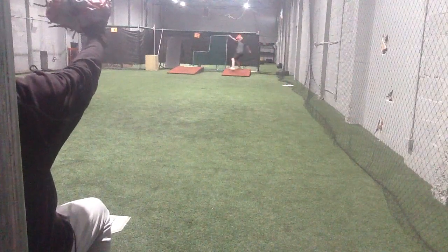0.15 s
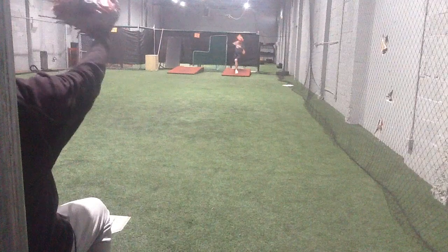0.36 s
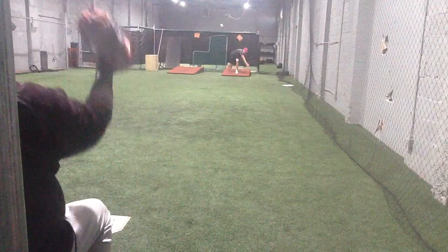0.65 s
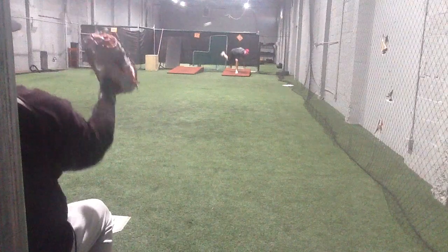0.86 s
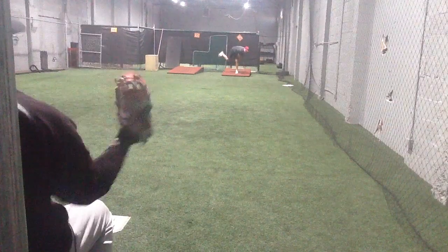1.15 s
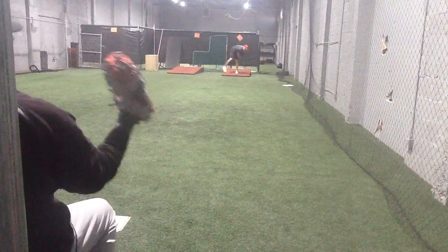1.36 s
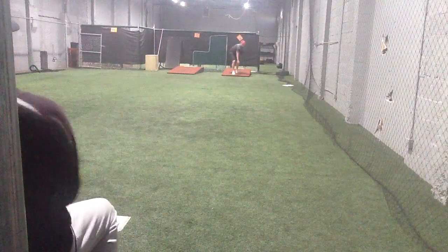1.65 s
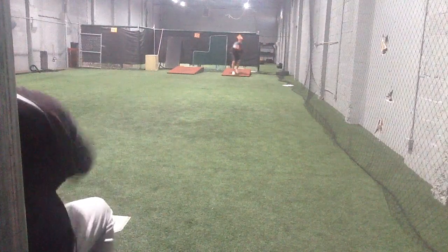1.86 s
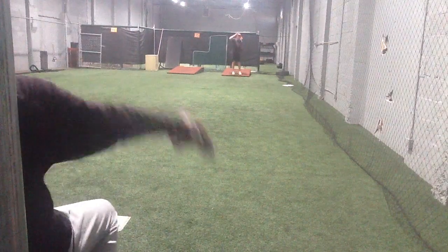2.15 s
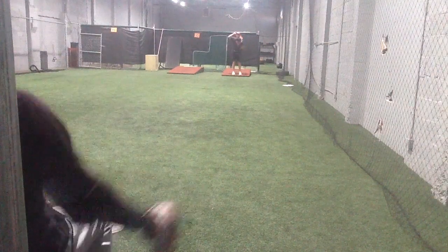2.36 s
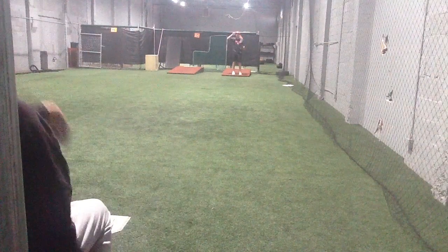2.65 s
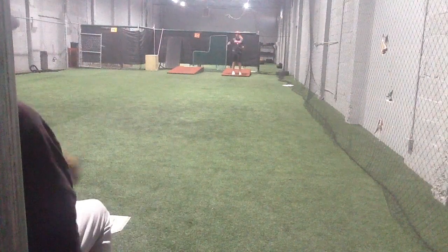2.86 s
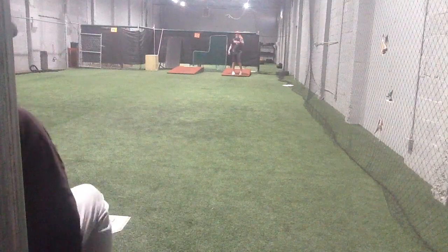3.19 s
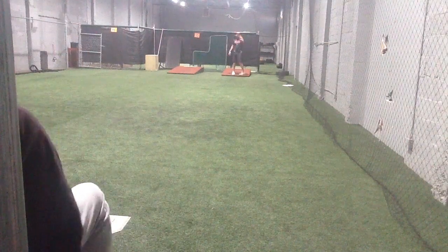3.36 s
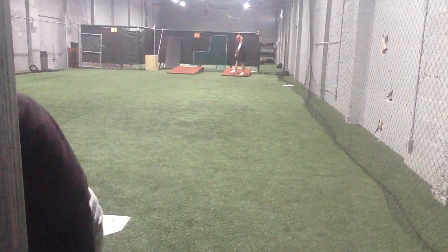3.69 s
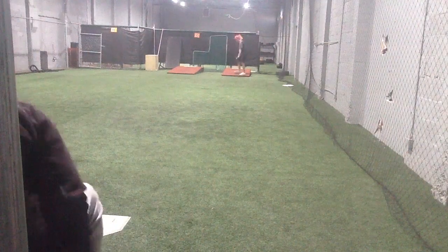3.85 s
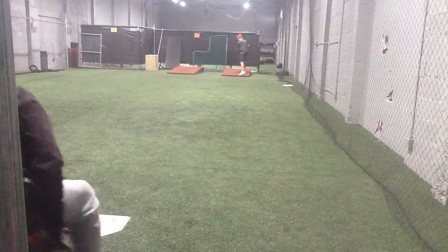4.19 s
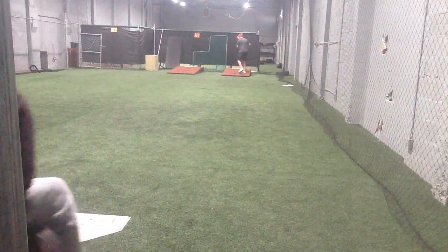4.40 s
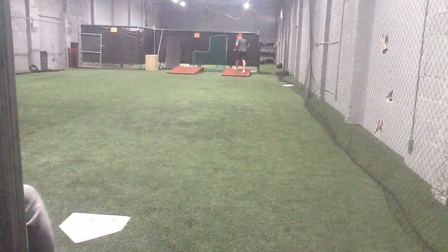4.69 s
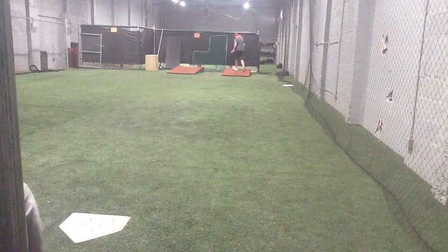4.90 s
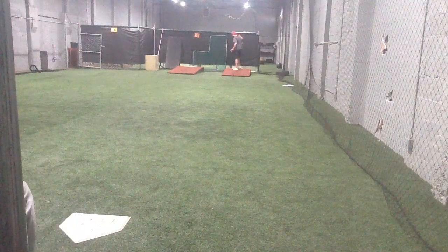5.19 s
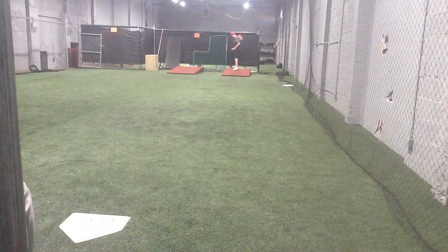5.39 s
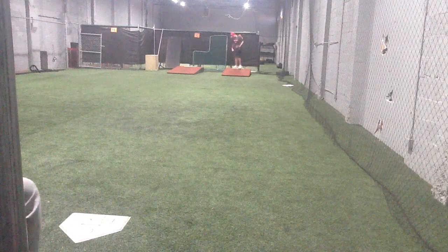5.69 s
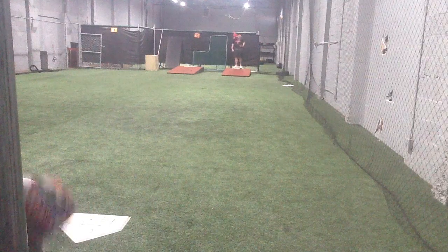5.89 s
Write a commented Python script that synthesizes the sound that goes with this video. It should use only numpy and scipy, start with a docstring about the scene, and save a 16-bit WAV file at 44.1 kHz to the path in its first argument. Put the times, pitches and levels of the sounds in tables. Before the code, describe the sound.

A large echoing indoor hall with turf, heard close beside the catcher through a small microphone. Faint air hiss and a wavering fan hum run throughout, with dull low rumbling and light rustle in the first second. At 1.1 seconds a ball smacks into a leather mitt: a single very loud, short, bright crack with a woody pocket pop, then a ringing hall tail and faint wall returns. From 1.5 to 2.5 soft movement, tiny ticks and a barely audible thin whistle near 1.8 to 1.9. A quiet low drone and scrape build after 3. At 3.55 a hard plastic bucket knock, with smaller rattles and a dull thump to 3.9. Light knocks come around 4.25, then the strongest hollow booming clatter at 4.5 to 4.6. It echoes away, with faint ticks near 4.85 and slight scuffs to 6.

```python
"""A long, echoing hall with turf underfoot: a pitched ball pops into a leather mitt close to a small microphone.
The pitcher's stride rumbles before it, as shaped noise; the mitt is dying sines and a noise crack.
Later the catcher shifts on a plastic bucket: rough pushes ring its shell and air, so it knocks, scuffs
and booms. Small ticks, a thin whistle and a low drone come and go; fans hum as wavering sines over
a faint hiss. The hall answers with a noisy tail, and gain control dips after loud sounds."""
import sys
import numpy as np
from scipy import signal
from scipy.fft import rfft, irfft
from scipy.io import wavfile
from scipy.ndimage import uniform_filter1d

SR = 44100
rng = np.random.default_rng(int(sys.argv[2]) if len(sys.argv) > 2 else 0)


def put_to_file(sound):
    """Save the sound as 16-bit audio at rate SR, in the file named by the first command-line argument."""
    columns = np.atleast_2d(sound).T  # one column per channel
    safe = np.clip(columns, -1, 1)
    whole_steps = np.round(safe * 32767)
    wavfile.write(sys.argv[1], SR, whole_steps.astype(np.int16))


N = 266224  # samples

# Source levels are those ahead of the recorder; spectra and modes give relative levels.
# The catch, close to the microphone: t/s, peak level of the pop/dB
CATCH = [(1.1023, -4.5)]
# Ringing leather pocket: f/Hz, level/dB, t60/s
POCKET_MODES = [(387, -2, 0.11), (756, 16.5, 0.0056), (1164, 2.5, 0.023), (4570, -11.5, 0.008)]
# Nearby surfaces throw the pop back: delay/s, level against the pop/dB, length/s, f/Hz
NEAR_ECHOES = [(.0036, -7, .0036, 560), (.0075, -8, .007, 670)]
# Crack of the leather: f/Hz, level per Hz/dB
CRACK_SPECTRUM = [(1060, -29.5), (1800, -8.5), (2120, -15), (4660, 2), (5250, -7.5), (11200, -7.5),
                  (12600, -7), (15000, -18), (16000, -36)]
# The pop as it leaves in all directions: f/Hz, level per Hz/dB
SPREAD_SPECTRUM = [(53, -47), (90, -31), (169, -3.5), (310, -8), (368, -4.5), (633, -3), (1020, -7),
                   (1240, -9.5), (2430, -8), (2950, -21.5), (13700, -46), (15000, -36), (16000, -60)]
# Side walls return the crack: delay/s, level/dB (4 dB above the return's level against the direct crack)
SIDE_WALLS = [(0.029, -17), (0.062, -23)]
# End walls throw the pop to and fro: peak level of the first return/dB, change a trip/dB, f/Hz
FLUTTER = -36, -8, 1970
# Distance of the end walls as time: first return/s, round trip/s
FLUTTER_TIMES = .237, .249
# Netting and clutter scatter a bright spray: level against the crack/dB, time of the bend/s
SPRAY_DB, SPRAY_BEND_S = -24.5, 0.076
SPRAY_FALL, SPRAY_EXTRA_FALL = 60, 197  # dB a second throughout; more dB a second after the bend

# Plastic bucket shell: f/Hz, level/dB, t60/s
SHELL_MODES = [(488, -5, 0.086), (596, -1, 0.036), (804, -0.5, 0.015), (1045, 1, 0.023),
               (1183, -2.5, 0.036), (1340, -6, 0.019), (1578, 5.5, 0.019), (1800, -2, 0.021),
               (2038, 2.5, 0.02), (2346, 2.5, 0.014), (2675, -1, 0.019), (3055, 0, 0.034),
               (3220, -3, 0.022)]
# Air in the bucket: f/Hz, level/dB, t60/s
DRUM_MODES = [(139.4, 8.5, 0.52), (162.3, -1, 0.74), (220.6, 2.5, 0.21), (285.4, 1, 0.23), (454, 15, 0.038)]
# Blows on the bucket: t/s, shell peak level/dB, crack peak level/dB, crack f/Hz,
# boom level/dB (8 dB above its peak), contact/s, f of the struck spot/Hz, softness/0-1
KNOCKS = [(3.547, -15.5, -12.5, 6700, -68, 0.0088, 2000, 0.02),
          (3.597, -30, -35, 3960, -70, 0.011, 1520, 0.5), (3.663, -38.5, -46, 4000, -57, 0.0037, 1080, 1),
          (3.769, -34, -55, 5700, -49, 0.0045, 1600, .4), (3.783, -32.5, -56, 6000, -55, .0039, 546, .7),
          (3.812, -32.5, -37, 4470, -44, 0.0039, 1100, 0.46),
          (3.863, -30, -29, 5900, -53, .0063, 1500, .05), (4.049, -48, -56, 3550, -82, 0.0073, 1500, 0.7),
          (4.217, -37.5, -51.5, 7420, -72, 0.015, 516, .8),
          (4.233, -50, -32, 5100, -41.5, 0.0046, 2600, 0.44),
          (4.263, -23.5, -26, 6860, -34.5, 0.0046, 1800, 0), (4.275, -35, -52, 4000, -52, .0065, 875, 0.8),
          (4.323, -32.5, -33.5, 10500, -62, 0.0066, 1720, 0.7),
          (4.340, -39, -53, 4000, -42, .004, 1380, 0.44), (4.419, -35, -42.5, 5150, -73, 0.011, 1450, 0.86),
          (4.471, -40, -50, 3400, -27.5, 0.0024, 800, 0.5),
          (4.522, -17, -23.5, 3700, -12.5, 0.0075, 520, 0),
          (4.536, -28.5, -38.5, 4000, -17, 0.068, 500, 0.1),
          (4.553, -29, -29, 9350, -16, 0.0097, 1990, 0.3), (4.571, -30.5, -35, 9000, -24, 0.017, 890, 0.1),
          (4.589, -17.5, -15, 11400, -24.5, 0.0079, 1300, 0.2),
          (4.611, -25.5, -35, 3970, -50, 0.014, 1050, .6)]
# The softer a blow, the slower it rises and the fewer modes it reaches.
HARD_RISE, SOFT_RISE = .025, .55  # shares of the contact time
HARD_NARROW_DB, SOFT_NARROW_DB = 3.5, 17  # fall one octave off the struck spot
# The bucket drags and its shell sings along: peak t/s, rise/s, fall/s, level/dB, f of the rubbed spot/Hz
DRAGS = [(3.24, .18, 0.56, -68.5, 1480), (3.575, 0.028, 0.13, -44.5, 2170), (3.789, .06, 0.17, -48, 1020),
         (4.24, 0.046, 0.1, -60, 613), (4.678, 0.15, 0.29, -54, 1340)]
DRAG_NARROW_DB = 6.5  # fall one octave off the rubbed spot

# Bodies moving on the turf: peak t/s, rise/s, fall/s, rumble level/dB, body level/dB, rustle level/dB
MOVES = [(0.38, .06, 0.58, -57.5, -76, -70.5), (0.628, 0.19, 0.31, -55, -51, -62),
         (1.08, 0.4, 0.12, -55.5, -62.5, -62.5), (1.54, 0.065, 0.11, -61, -51, -65),
         (1.73, 0.6, .3, -49, -52, -66.5), (1.97, 0.17, 0.2, -62.5, -60, -74),
         (2.254, 0.27, 0.084, -77.5, -63.5, -70.5), (2.462, 0.2, 0.2, -72, -66, -66.5),
         (3.222, 0.28, 0.3, -69.5, -62.5, -80), (3.385, 0.16, 0.2, -86, -63.5, -93),
         (3.769, 0.041, 0.099, -48, -46, -52.5), (3.827, 0.077, 0.062, -40.5, -42.5, -64),
         (3.89, 0.046, 0.19, -61, -51.5, -63), (4.031, .15, 0.64, -68, -61, -71),
         (4.252, 0.053, 0.032, -54, -43, -45), (4.479, 0.012, 0.023, -57, -43, -66),
         (4.504, 0.038, 0.066, -41, -44, -41.5), (5.02, 0.083, 0.6, -67, -75, -68.5),
         (5.285, .1, 0.095, -77, -56.5, -62), (5.469, 0.037, 0.17, -61.5, -58, -62.5),
         (5.721, 0.053, 0.046, -73, -64.5, -70), (5.98, 0.47, 0.38, -61.5, -67.5, -75)]
# Rumble through the floor: f/Hz, level per Hz/dB
RUMBLE_SPECTRUM = [(35, -64.5), (60, -21), (151, 2), (237, 3), (313, -1), (400, -3.5), (520, -17.5),
                   (880, -120)]
# Dull body of the movement: f/Hz, level per Hz/dB
BODY_SPECTRUM = [(180, -54), (300, -18), (495, 1), (636, -2.5), (1300, -10), (1590, -12.5), (3000, -22.5),
                 (3900, -49), (6600, -120)]
# Cloth and turf: f/Hz, level per Hz/dB
RUSTLE_SPECTRUM = [(1290, -31), (2200, -7.5), (3840, -5), (6370, -6.5), (10700, -7.5), (15000, -10),
                   (16000, -20)]
GRAIN_DB = 2  # rms unevenness of the rubbing
SWELL_DB, SWELL_BEND = -19.5, 1.175  # level one rise or fall time off the peak; roundness of the top

# Small ticks of gear and netting, the last two the end wall's returns of the bucket knocks:
# t/s, peak level/dB, f/Hz
TICKS = [(1.614, -54, 12000), (1.745, -45, 6240), (1.951, -48, 1200), (2.45, -47, 8500),
         (4.839, -43.5, 3040), (4.886, -41, 2730)]
# A thin whistle high up: peak t/s, rise/s, fall/s, level/dB
WHISTLE = [(1.8, .04, .025, -61.5), (1.92, 0.089, 0.06, -62.5)]
# A low drone swells and fades: peak t/s, rise/s, fall/s, level/dB
DRONE = [(3.3, 0.4, 0.27, -65), (3.62, .3, 0.14, -60), (3.835, .08, .12, -73), (4.24, 0.5, .16, -64),
         (4.44, .12, 0.025, -64)]
WHISTLE_HZ, DRONE_HZ = 12050, 100.5

# Steady air noise: f/Hz, level per Hz/dB
AIR_SPECTRUM = [(12, -65), (20, -25.5), (168, 0), (293, -7.5), (410, -9.5), (472, -15), (574, -8.5),
                (642, -15), (738, -9.5), (873, -16.5), (4420, -23.5), (14700, -20.5), (16000, -39)]
AIR_DB = -62
# Fans and lamps: f/Hz, level/dB (4.5 dB below the mean amplitude of the sine)
HUM = [(118.4, -75.5), (166.9, -87), (581.4, -69.5), (726.7, -81), (1459, -88)]

# Dying away of the hall: f/Hz, t60/s
HALL_DECAY = [(100, 0.33), (250, 2.17), (600, 1.52), (1500, 0.82), (3000, 0.89), (6000, 0.85),
              (12000, 0.77)]
# Tone of the hall: f/Hz, level/dB
HALL_COLOUR = [(70, -29), (150, 7), (400, 0.5), (1200, 0.5), (2500, -6.5), (5000, -1.5), (14000, 2.5)]
EDGE_HZ = 15500  # upper band limit of the recorder


def mitt():
    """The leather cracks as the ball enters, the pocket snaps shut and surfaces near and far answer.

    Returns the sound at the microphone and the click that fills the hall."""
    out, sent = np.zeros((2, N))
    first, trip = FLUTTER_TIMES
    flutter_db, trip_db, flutter_hz = FLUTTER
    for s, db in CATCH:
        pop = peaked(above(-ring(POCKET_MODES, seconds=0.068), 290), db)
        for delay, echo_db, length, hz in NEAR_ECHOES:
            t = np.arange(0, length, 1 / SR)
            rounded = np.sqrt(np.sin(np.pi * t / length))
            add(pop, delay, -amp(db + echo_db) * np.sin(2 * np.pi * hz * t) * rounded)
        add(out, s, pop)

        t = np.arange(-.002, .02, 1 / SR)
        burst = amp(np.where(t < 0, 7000 * t, -5200 * t))  # rise and fall in dB a second
        crack = coloured(rng.standard_normal(len(t)), CRACK_SPECTRUM) * burst
        add(out, s + t[0], amp(db - 12) * crack)
        for delay, wall_db in SIDE_WALLS:
            add(out, s + delay + t[0], amp(db - 16 + wall_db) * crack)

        t = np.arange(0, .4, 1 / SR)
        spray = coloured(rng.standard_normal(len(t)), CRACK_SPECTRUM)
        spray *= amp(5.1 * wander(.002)[:len(t)]) * np.minimum(t / .004, 1)
        fall_db = SPRAY_FALL * t + SPRAY_EXTRA_FALL * np.maximum(t - SPRAY_BEND_S, 0)
        add(out, s, amp(db - 12 + SPRAY_DB - fall_db) * spray)

        for k in range(4):
            returned = ring([(flutter_hz, 0, .02)], seconds=.03)
            add(out, s + first + k * trip, peaked(returned, flutter_db + k * trip_db))
        sent[round(s * SR)] = amp(db)
    # colour the click but keep its energy
    return out, coloured(sent, SPREAD_SPECTRUM) * np.linalg.norm(sent) / np.sqrt(N)


def bucket():
    """A short rough push drives the shell and has a bright crack of its own; the air booms with it.

    Returns the sound at the microphone and the smoother sum over all directions that fills the hall."""
    out, sent = np.zeros((2, N))
    t = np.arange(2000) / SR
    for s, shell_db, crack_db, crack_hz, boom_db, contact, spot_hz, soft in KNOCKS:
        soft = np.clip(soft, 0, 1)
        rise = abs(contact * (HARD_RISE + (SOFT_RISE - HARD_RISE) * soft))
        narrow_db = HARD_NARROW_DB + (SOFT_NARROW_DB - HARD_NARROW_DB) * soft
        noise = rng.standard_normal(len(t))
        noise[round(rise * SR)] = -6.0 * (1 - soft)  # the first solid contact
        push = noise * np.exp(-t / max(contact, 1e-4)) * (1 - np.exp(-t / max(rise, 1e-5)))

        modes = near(spot_hz, narrow_db)
        shell = peaked(signal.fftconvolve(push, above(ring(modes, seconds=.1), 370)), shell_db)
        edges = [.5 * crack_hz, min(1.05 * crack_hz, .45 * SR)]
        band = signal.butter(1, edges, "band", fs=SR, output="sos")
        sharpened = push * (0.34 + 0.93 * np.exp(-t / 0.0012))
        crack = peaked(signal.sosfilt(band, sharpened), crack_db)
        boom = peaked(above(ring(DRUM_MODES), 84), boom_db - 8.0)
        for part in shell, crack, boom:
            add(out, s, part)

        # to the hall: brief shell and crack with energy set by the direct ones
        brief = above(ring([(hz, db, .004) for hz, db, t60 in modes], seconds=.02), 330)
        add(sent, s, brief * np.linalg.norm(shell) / np.linalg.norm(brief))
        add(sent, s, signal.sosfilt(band, t == 0) * np.linalg.norm(crack) * 1.37)
        add(sent, s, amp(-2.5) * boom)
    return out, sent


def near(spot_hz, narrow_db):
    """The spot that is touched favours the shell modes near its own pitch."""
    fall = max(narrow_db, 0)
    return [(hz, db - fall * np.log2(hz / spot_hz) ** 2, t60) for hz, db, t60 in SHELL_MODES]


def drags():
    """Uneven friction noise rings the shell."""
    rub = amp(2.4 * wander(0.0024)) * rng.standard_normal(N)
    out = np.zeros(N)
    for *swell, spot_hz in DRAGS:
        shell = above(ring(near(spot_hz, DRAG_NARROW_DB), seconds=.1), 300)
        out += signal.oaconvolve(swells([swell])[0] * rub, shell / np.linalg.norm(shell))[:N]
    return out


def moves():
    """Rubbing noise: rumble through the floor, dull body, rustle of cloth and turf, all grainy."""
    spectra = RUMBLE_SPECTRUM, BODY_SPECTRUM, RUSTLE_SPECTRUM
    out = np.zeros(N)
    for gain, spectrum, grain_s in zip(swells(MOVES), spectra, (.03, .004, .002)):
        grain = amp(GRAIN_DB * wander(grain_s))
        out += gain * grain * coloured(rng.standard_normal(N), spectrum)
    return out


def ticks():
    """Each click is two brief dying sines, one at its own pitch and one lower."""
    out = np.zeros(N)
    for s, db, hz in TICKS:
        add(out, s, peaked(ring([(hz, 0, .005), (hz * 0.63, -3, .008)], seconds=.03), db))
    return out


def whistle():
    """A thin high tone, blurred by rapid changes of level."""
    return fuzzy_tone(WHISTLE, WHISTLE_HZ, .0015)


def drone():
    """A low tone, blurred by slower changes of level."""
    return fuzzy_tone(DRONE, DRONE_HZ, 0.017)


def air():
    """Steady air noise that swells a little."""
    return amp(AIR_DB + 0.48 * wander(.25)) * coloured(rng.standard_normal(N), AIR_SPECTRUM)


def fans():
    """Fans and lamps hum in sines that waver in level and phase."""
    t = np.arange(N) / SR
    out = np.zeros(N)
    for hz, db in HUM:
        level = amp(db + 4.5 + 0.78 * wander(0.03))
        out += level * np.sin(2 * np.pi * hz * t + 0.27 * wander(0.02))
    return out


def hall(x, gap=0.004, build=0.029):
    """Evenly dense taps of random sign that grow louder after a gap/s, each band dying at its own speed."""
    size = 2 * SR
    taps = np.zeros(size)
    at = np.arange(0, size - 20, 20)
    taps[at + rng.integers(0, 20, len(at))] = rng.choice([-1., 1.], len(at))
    taps *= amp(1.76 * wander(0.0041)[:size])  # uneven walls bunch the returns
    hz, t, bands = signal.stft(taps, SR, nperseg=512)
    band_db = read(HALL_COLOUR, hz)[:, None] - 60 * t / read(HALL_DECAY, hz)[:, None]
    tail = signal.istft(bands * amp(band_db), SR, nperseg=512)[1]
    tail *= np.clip((np.arange(len(tail)) / SR - gap) / build, 0, 1)
    return signal.fftconvolve(x, tail / np.linalg.norm(tail))[:N]


def fuzzy_tone(rows, hz, wobble):
    """A sine that swells and fades, its level roughened over wobble seconds into a narrow band."""
    rough = 1 + .5 * wander(wobble)
    return swells(rows)[0] * np.sqrt(2) * rough * np.sin(2 * np.pi * hz * np.arange(N) / SR)


def swells(rows):
    """Rounded rises and falls; one gain curve for each level column, overlaps adding as power."""
    t = np.arange(0, N / SR + .002, .001)
    s, rise, fall, *levels = np.transpose(rows)[:, :, None]
    off = np.maximum((s - t) / np.maximum(rise, .004), (t - s) / np.maximum(fall, .004))
    shape = amp(SWELL_DB * off ** SWELL_BEND)
    return [np.interp(np.arange(N) / SR, t, np.linalg.norm(amp(db) * shape, axis=0)) for db in levels]


def ring(modes, seconds=0.31):
    """The sum of dying sines that a struck thing answers with."""
    t = np.arange(round(seconds * SR)) / SR
    return sum(amp(db - 60 * t / max(t60, .003)) * np.sin(2 * np.pi * hz * t) for hz, db, t60 in modes)


def above(x, hz, order=2):
    """High-pass: small things radiate little bass."""
    return signal.sosfilt(signal.butter(order, hz, "high", fs=SR, output="sos"), x)


def coloured(x, points):
    """Filters x by a spectrum table; rms 1."""
    gain = amp(read(points, np.fft.rfftfreq(len(x), 1 / SR)))
    return evened(irfft(rfft(x) * gain, len(x)))


def wander(seconds):
    """Random drift of rms 1, smoothed twice over the given time."""
    size = round(seconds * SR)
    return evened(uniform_filter1d(uniform_filter1d(rng.standard_normal(N), size), size))


def read(points, hz):
    """Reads a table between its points along log frequency."""
    f, value = np.transpose(points)
    return np.interp(np.log(hz + 1), np.log(f + 1), value)


def amp(db):
    """Decibels to amplitude."""
    return 10 ** (np.asarray(db) / 20)


def evened(x):
    """Scales x to rms 1."""
    return x / np.sqrt(np.mean(x ** 2) + 1e-20)


def peaked(x, db):
    """Scales x to a peak level."""
    return amp(db) * x / abs(x).max()


def add(mix, s, sound):
    """Lays a sound into the mix from s seconds on, cut at the end."""
    part = mix[round(s * SR):][:len(sound)]
    part += sound[:len(part)]


def scene():
    """The close sounds, the hall's answer to catch, bucket and bodies, and the background."""
    catch, pop = mitt()
    seat, knocks = bucket()
    bodies = moves() + drags()
    wet = hall(amp(13.0) * pop + amp(-11.0) * knocks + amp(-9) * bodies)
    background = air() + fans()
    return (catch + seat + ticks() + wet + bodies + whistle() + drone() + background)[None]


def record(dry):
    """Gain control turns down after loud sounds and creeps back; bass cut; then the band limit."""
    power_db = 10 * np.log10(abs(uniform_filter1d(dry[0] ** 2, 600)) + 1e-12)
    fall = np.arange(N) * 6.15 / SR  # the held level sinks by this many dB a second
    held_db = np.maximum.accumulate(power_db + fall) - fall
    over_db = np.maximum(held_db + 30.5, 0)
    # one-pole lag of 51 ms that passes 0.051 / 0.091 of a steady excess
    slow = signal.lfilter([1 / (0.091 * SR)], [1, 1 / (0.051 * SR) - 1], over_db)
    thin = above(dry / amp(0.77 * slow), 81, order=4)
    limit = signal.firwin(255, EDGE_HZ, window=("kaiser", 9), fs=SR)
    return signal.oaconvolve(thin, limit[None], "same")


dry = scene()
out = record(dry)
put_to_file(out)
```